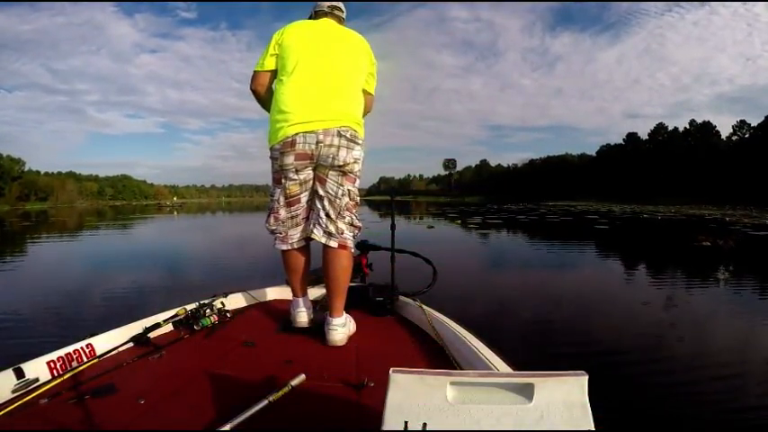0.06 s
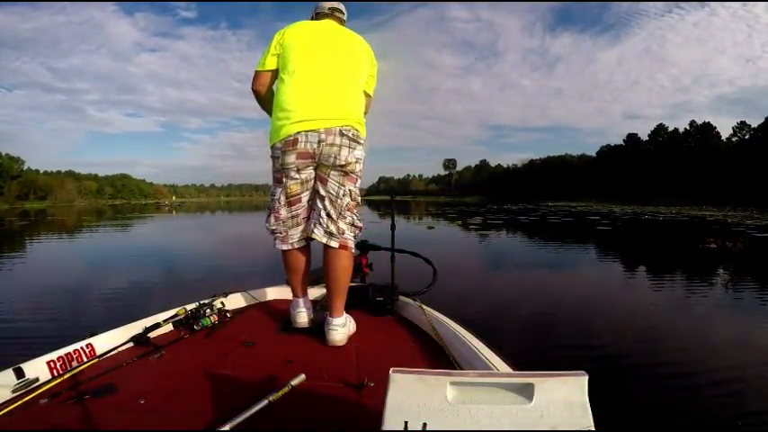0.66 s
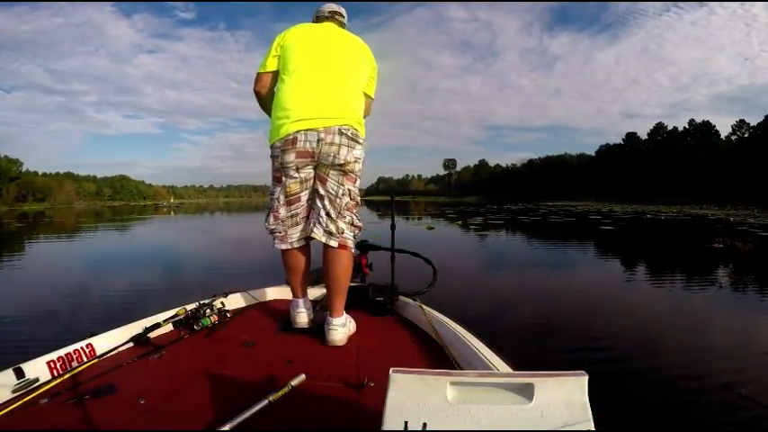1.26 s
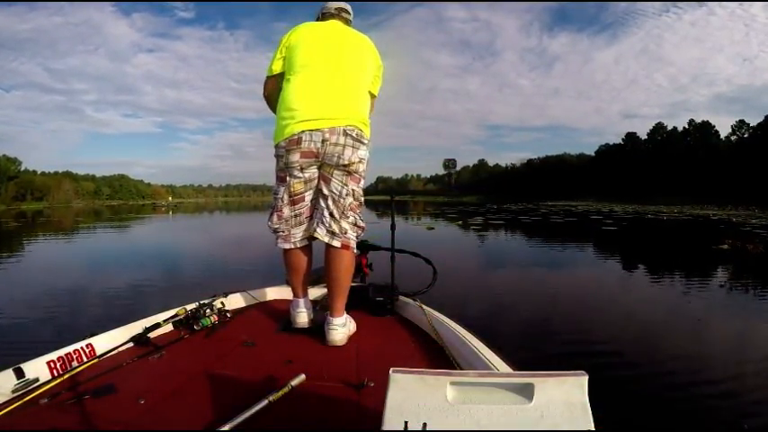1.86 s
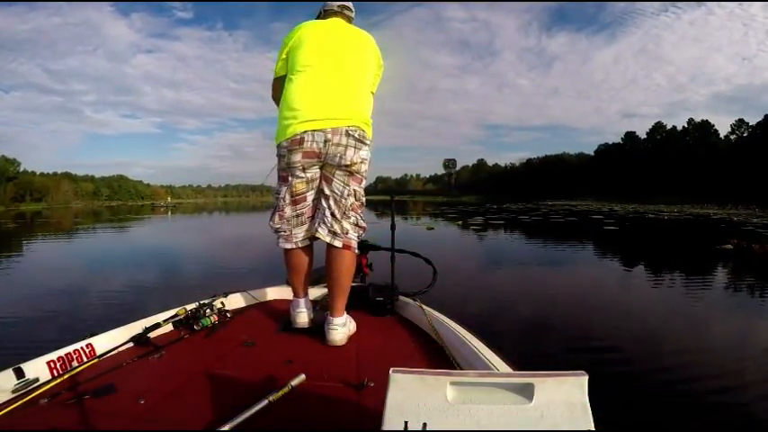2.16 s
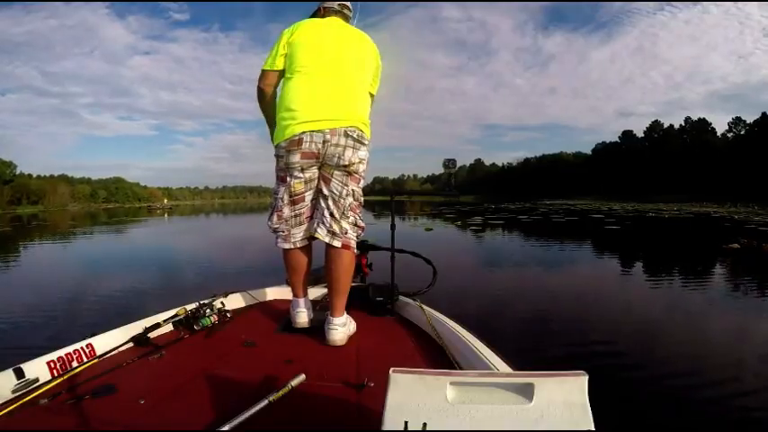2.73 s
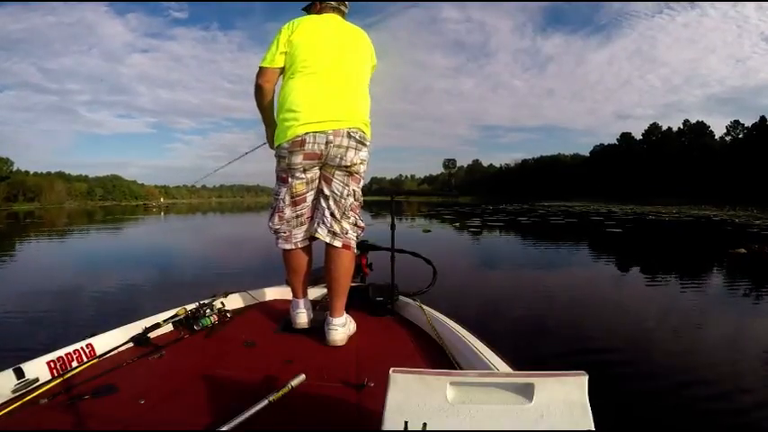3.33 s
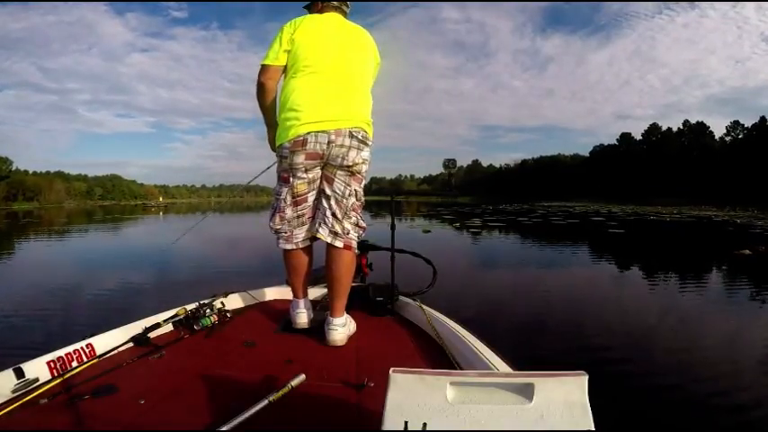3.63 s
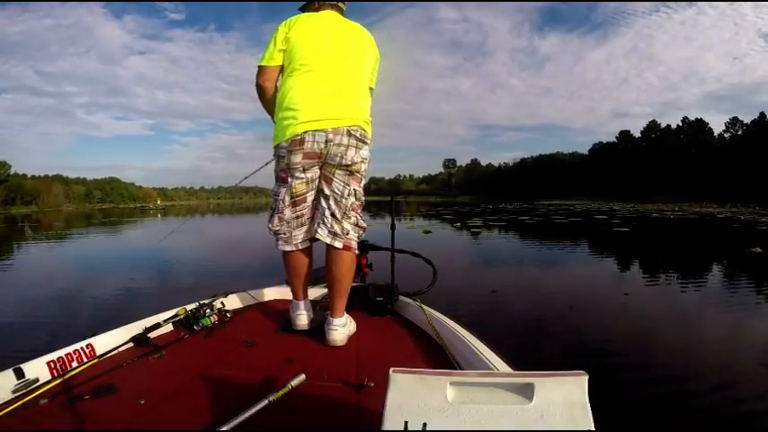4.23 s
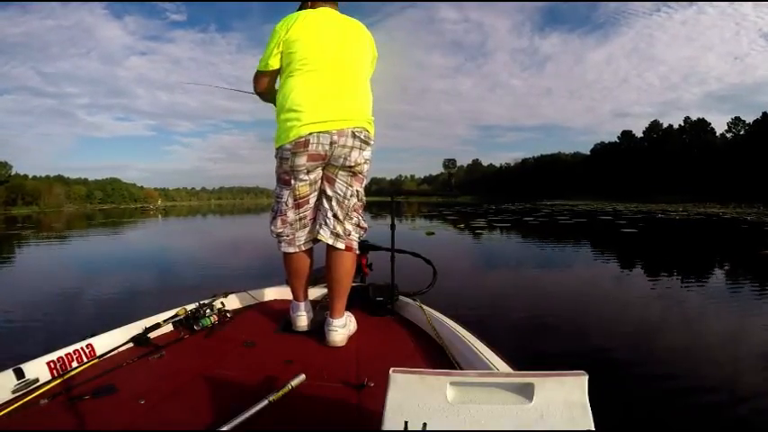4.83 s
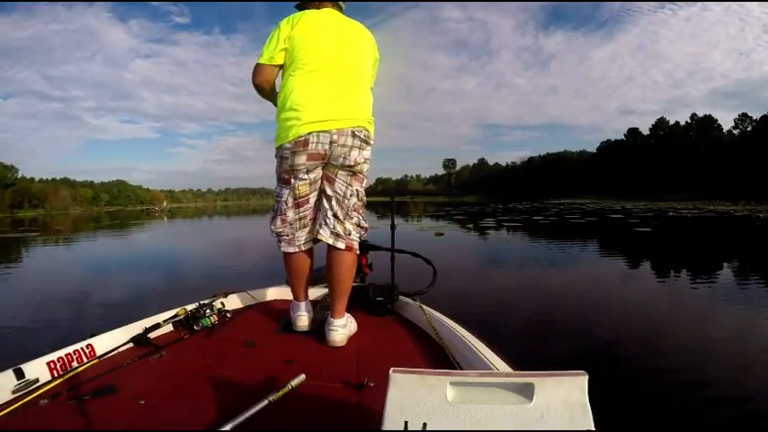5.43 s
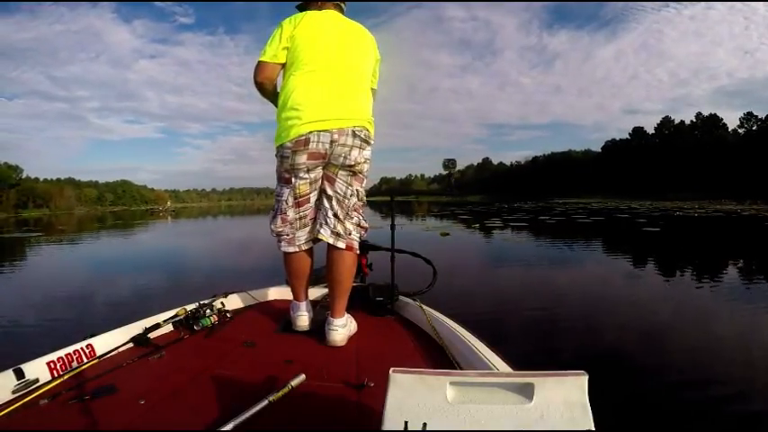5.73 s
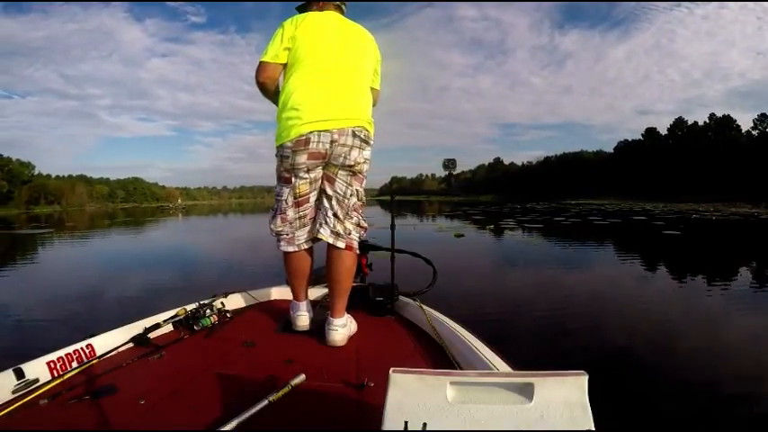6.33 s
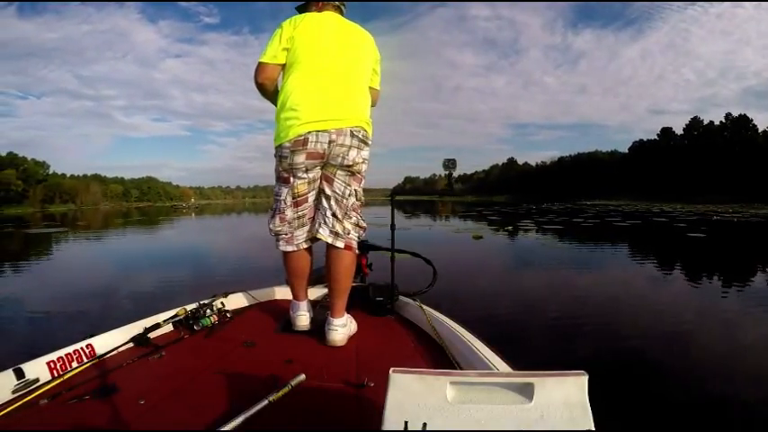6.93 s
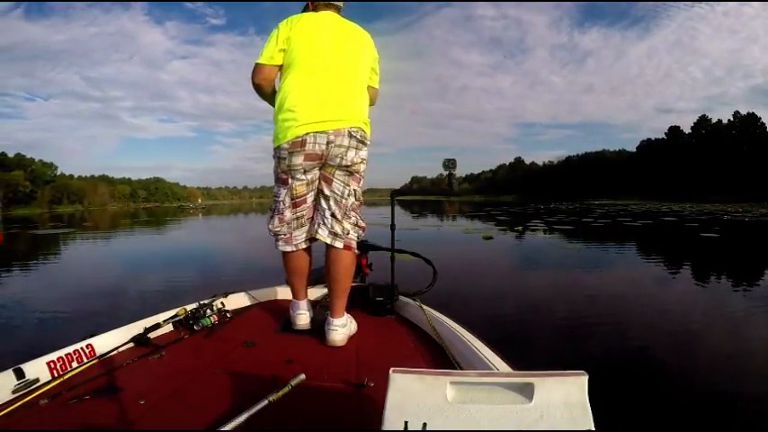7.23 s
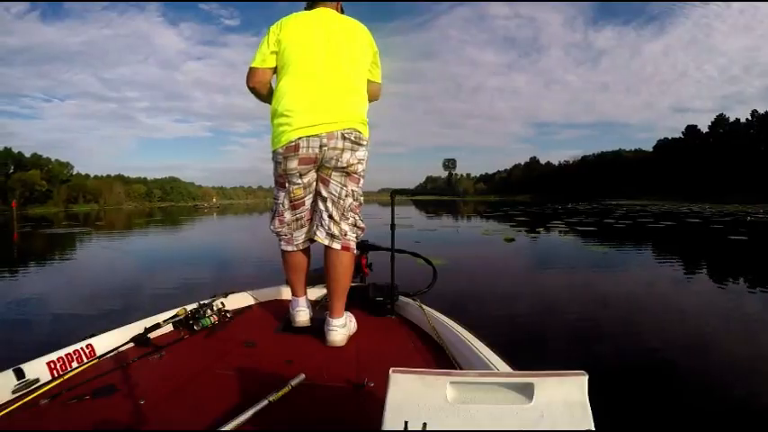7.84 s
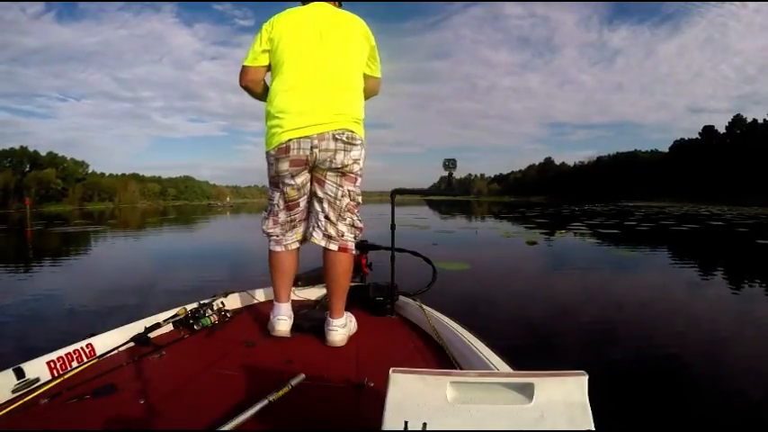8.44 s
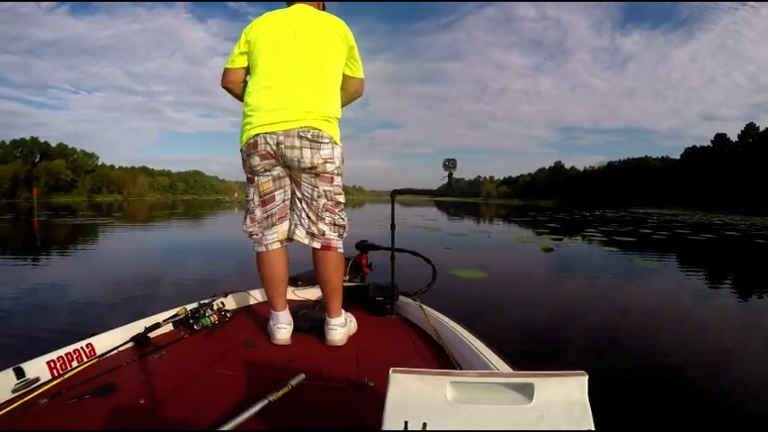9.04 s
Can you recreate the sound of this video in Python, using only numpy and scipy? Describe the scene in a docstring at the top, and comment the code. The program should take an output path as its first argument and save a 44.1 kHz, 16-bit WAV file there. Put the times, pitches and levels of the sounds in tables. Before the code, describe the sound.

Heard from close to the deck of a small boat on still water, a low electric motor hum pulses steadily over a rumbling hull and soft lapping. Light clicks come from the angler's tackle. About halfway through, a few dull footsteps boom on the deck as the wash swells and the hum shifts tone. A heavier cluster of steps lands near the end, while the motor cuts out and fades.

```python
"""A small fishing boat on a calm lake, microphone fixed on board, close to the deck.
From the start an electric trolling motor drones and throbs through the hull; ripples pat the bow and
the angler's tackle ticks. Between 4 and 5 s his feet thump on the hollow deck, the wash churns up and
the hum changes colour as the motor is steered. After 8 s come a second swirl and the loudest footfalls;
the power is cut at 8.4 s and the three-blade propeller coasts down."""
import sys
import numpy as np
from scipy import signal
from scipy.fft import rfft, irfft, next_fast_len
from scipy.io import wavfile

SR = 44100
rng = np.random.default_rng(int(sys.argv[2]) if len(sys.argv) > 2 else 0)


def int16_out(signal):
    """Quantize to a 16-bit WAV file."""
    q = np.round(np.clip(np.atleast_2d(signal).T, -1, 1) * 32767)
    wavfile.write(sys.argv[1], SR, q.astype(np.int16))


N = 405146
TIME = np.arange(N) / SR
STEER_S, STOP_S, SWING_S = 4.8, 8.4, 0.31  # motor steered, power cut, easing time of a swing


def gain_of(db):
    """Decibels to amplitude."""
    return 10 ** (np.asarray(db) / 20)


def unit_rms(x):
    """Scales to an rms of one."""
    return x / np.sqrt(np.mean(x ** 2) + 1e-20)


def spectrum_at(points, hz):
    """Interpolates (f/Hz, level/dB) points on a logarithmic frequency axis."""
    f, db = np.transpose(points)
    return np.interp(np.log(hz + 1), np.log(f + 1), db)


def curve(points):
    """One value per sample from (t/s, value) points."""
    return np.interp(TIME, *np.transpose(points))


def swell(peak_s, build_s, settle_s):
    """A smooth rise from nothing to one and back."""
    return np.exp(-((TIME - peak_s) / np.where(TIME < peak_s, build_s, settle_s)) ** 2)


def step(s, width_s):
    """A smooth change from nothing to one around time s."""
    return .5 + .5 * np.tanh((TIME - s) / width_s)


def add(mix, s, sound):
    """Mixes a sound in at time s."""
    part = mix[max(round(s * SR), 0):][:len(sound)]
    part += sound[:len(part)]


def shaped_noise(shape_db):
    """Noise of unit rms whose spectrum is a function of frequency."""
    size = next_fast_len(N)
    hz = np.fft.rfftfreq(size, 1 / SR)
    white = rfft(rng.standard_normal(size))
    return unit_rms(irfft(white * gain_of(shape_db(hz)), size)[:N])


def noise(colour):
    """Noise of unit rms coloured by (f/Hz, level/dB) points."""
    return shaped_noise(lambda hz: spectrum_at(colour, hz))


def band(centre_hz, half_width_hz):
    """Noise in one resonance; centred on zero it is a slow random drift."""
    return shaped_noise(lambda hz: -20 * np.log10(1 + ((hz - centre_hz) / half_width_hz) ** 2))


def puffs(events, colour, rise_s, t60):
    """A quickly dying burst of coloured noise for each (t/s, level/dB) event."""
    envelope, t = np.zeros(N), np.arange(SR // 4) / SR
    for s, db in events:
        add(envelope, s, (1 - np.exp(-t / rise_s)) * gain_of(db - 60 * t / t60))
    return envelope * noise(colour)


# Background hiss: f/Hz, relative level/dB
HISS_COLOUR = [(450, -12), (900, -3), (1200, -2), (2500, -3), (2950, -1.5), (3400, -2.5), (4600, -4),
               (5800, -7.5), (7400, -8.5), (8200, -13.5), (10400, -16.5), (13500, -20), (15000, -23)]
def steady_hiss(hiss_db=-67.02):
    """A steady hiss behind everything else."""
    return gain_of(hiss_db) * noise(HISS_COLOUR)


# The motor's speed controller, faint at the microphone: f/Hz, half-width/Hz, level/dB
CONTROLLER_HARMONICS = [(4786, 120, -81.5), (9560, 110, -90), (14380, 190, -96)]
def controller_whine():
    """The speed controller gives off a thin, fuzzy whine of three harmonics."""
    return sum(gain_of(db) * band(hz, width) for hz, width, db in CONTROLLER_HARMONICS)


# The angler moving, on board with the microphone: t/s, half-length/s, rise/dB
ANGLER_MOVES = [(1.15, 0.32, 1), (3.153, 0.38, 7), (4.1, 0.9, 5.5), (6.95, 0.44, -1), (8.548, 0.47, 0)]
def clothes_rustle(still_db=-80, clump_db=3):
    """Clothes and line rub faintly in short clumps, swelling with the larger movements."""
    level = still_db + sum(rise * swell(s, half, half) for s, half, rise in ANGLER_MOVES)
    colour = [(100, -59), (600, 4.5), (1080, 8.5), (1400, -1.5), (1900, 4.0), (3200, -4.0),
              (5000, -7.0), (9000, -43), (16000, -59)]
    return gain_of(level + clump_db * band(0, 23)) * noise(colour)


# Swirls beside the boat: peak t/s, build/s, settle/s, rise/dB
WASH_SWIRLS = [(4.68, 1.53, 0.5, 8.5), (8.44, 0.24, 0.29, 18)]
def churn_db():
    """The wash churns up around each swing of the motor; each sound follows its own share of the rise."""
    return sum(rise * swell(s, build, settle) for s, build, settle, rise in WASH_SWIRLS)


# Lapping at the waterline of the bow: f/Hz, relative level/dB
RIPPLE_COLOUR = [(150, -27), (350, 4.5), (550, -2), (680, -2.5), (800, -5.5), (1100, -11), (1700, -16.5),
                 (4000, -31), (9000, -41), (16000, -62)]
def bow_ripples(calm_db=-69, flicker_db=2, churn_share=0.35):
    """Ripples lap softly and without a break, rising with the churn."""
    level = calm_db + churn_share * churn_db() + flicker_db * band(0, 27)
    return gain_of(level) * noise(RIPPLE_COLOUR)


def hull_taps(calm_db=-64.5, per_s=5, spread_db=3, t60=0.02, churn_share=0.085):
    """Now and then a small ripple taps the hull, a little louder where the water churns."""
    out, t = np.zeros(N), np.arange(SR // 16) / SR
    level = calm_db + churn_share * churn_db()
    patter = noise([(200, -22.5), (600, -13), (1300, -13), (3000, -9), (8000, -20), (15000, -40)])
    for when, size in rng.random((round(per_s * TIME[-1]), 2)):
        at = int(when * (N - len(t)))
        db = level[at] + spread_db * (2 * size - 1)
        add(out, at / SR, gain_of(db - 60 * t / t60) * patter[at:at + len(t)])
    return out


# Larger ripples at the bow: t/s, relative level/dB
BOW_SLAPS = [(0.042, -54), (.163, -59), (.269, -60.5), (0.332, -56.5), (.541, -60), (.619, -62),
             (1.21, -58), (1.284, -60), (1.369, -61), (3.633, -58), (5.282, -59), (7.797, -72)]
# Their pat, heard from on board: f/Hz, relative level/dB
SLAP_COLOUR = [(200, -35), (480, 7), (680, 1), (1000, -7), (1800, -6), (3800, -16), (8000, -48),
               (15000, -55)]
def bow_slaps(gain_db=1.5):
    """A larger ripple meets the bow with a soft, dull pat."""
    return gain_of(gain_db) * puffs(BOW_SLAPS, SLAP_COLOUR, rise_s=0.002, t60=0.08)


# Churned water at the bow: f/Hz, relative level/dB
BOIL_COLOUR = [(60, -14), (105, -11), (155, 15), (205, -5.5), (250, 8), (285, 5), (322, 4), (365, -2.5),
               (405, -21), (470, -17), (520, -31), (600, -22), (670, -13.5), (760, -34), (1200, -53)]
def bow_boil(gain_db=-58.5):
    """Each swirl boils against the bow; the boil fades as the motor stops."""
    strength = (gain_of(churn_db()) - 1) * (1 - step(STOP_S, SWING_S))
    return gain_of(gain_db) * strength * noise(BOIL_COLOUR)


# The hull shaking under the microphone: f/Hz, relative level/dB
HULL_RUMBLE = [(17, -10), (30, -12), (40, -2.5), (50, 2.5), (60, 0), (70, -3), (82, -5), (95, -11.5),
               (115, -20.5), (170, -31.5), (230, -31), (400, -66), (1500, -100)]
# The hollow inside the hull: f/Hz, relative level/dB
HULL_DRUM = [(30, -47), (90, -33), (125, -6), (165, -10.5), (205, -13.5), (238, -10), (254, 1), (272, -11),
             (335, -16), (400, -22), (520, -29.5), (900, -65), (3000, -100)]
def hull_wash(rumble_db=-50.5, keel_db=-54, drum_db=-59, steered_db=-1, stopped_db=-5):
    """Propeller wash shakes the hull and drums in its hollow, easing when the motor stops."""
    churn = churn_db()
    rumble = gain_of(rumble_db + 0.25 * churn) * noise(HULL_RUMBLE)
    # as the boat turns, wash runs along the keel and stirs a higher hull resonance
    keel = gain_of(keel_db) * step(3.7, SWING_S) * band(centre_hz=87, half_width_hz=12)
    drum = gain_of(drum_db + churn + steered_db * step(STEER_S, SWING_S)) * noise(HULL_DRUM)
    return gain_of(stopped_db * step(STOP_S, 0.12)) * (rumble + keel + drum)


# Tackle and foot pedal, close by:
# t/s, relative level/dB, treble tilt/dB per octave, ring f/Hz, relative ring level/dB, t60/s
TACKLE_TICKS = [(1.661, -56, 1, 4430, 4.5, 0.023), (2.016, -59.5, -5, 3520, -4, 0.036),
                (2.13, -65, 5, 7100, 0, .04), (2.208, -66, 4, 6900, -1, 0.027),
                (2.315, -68, 4, 6600, 3, 0.059), (2.341, -67, 5, 7000, 0, 0.05),
                (2.558, -54.5, -2.5, 3100, -13, 0.049), (3.133, -57.5, -3, 1050, -13, 0.044),
                (4.021, -53.5, -7.5, 650, -2, 0.03), (4.144, -53, 4, 11000, -13, 0.038),
                (4.788, -56, -5, 2860, 0.5, 0.052), (5.182, -62, -2, 3000, 5, .035),
                (5.195, -57, -4, 2830, 1, 0.039), (5.202, -52, 2, 2920, 9, 0.035),
                (5.209, -54, -7, 3500, -10, 0.048), (7.8, -64, -3, 2200, 2, .05),
                (8.247, -56, -3, 676, 3, 0.051), (8.272, -48, -5.5, 1610, -7, 0.064),
                (8.291, -56, -8, 1600, 0, .05), (8.314, -43.5, -15, 1160, -11, 0.034),
                (8.364, -56.5, -14, 2930, 0, 0.043), (8.371, -53, -10, 2900, -1.5, 0.032),
                (8.454, -49.5, -11.5, 2170, -11.5, 0.091), (8.479, -60, -8, 1390, 2, 0.082)]
# Resonances of the tackle: f/Hz, width/Hz, relative level/dB
TACKLE_MODES = [(724, 770, -24), (1640, 1200, 6), (2260, 45, 6), (3370, 900, 6), (3960, 1000, 2),
                (5800, 2900, 8.5), (7400, 1800, -10), (11000, 1500, -22)]
def tackle_ticks(gain_db=1, ring_gain_db=1, rise_share=0.026, ring_width_share=0.097):
    """A brief scrape excites the tackle; the part that was hit adds a damped resonance of its own."""
    out, t = np.zeros(N), np.arange(SR // 8) / SR
    hz = np.fft.rfftfreq(len(t), 1 / SR)

    def resonance(centre, width):
        return 1 / (1 + (2 * (hz - centre) / width) ** 2)

    body = sum(gain_of(db) * resonance(f, width) / np.sqrt(width) for f, width, db in TACKLE_MODES)
    for s, db, tilt, ring_hz, ring_db, t60 in TACKLE_TICKS:
        attack = 1 - np.exp(-t / (rise_share * t60))  # short ticks start sharpest
        envelope = attack * gain_of(db + gain_db - 60 * t / t60)
        rub, knock = rfft(rng.standard_normal((2, len(t))))
        scrape = unit_rms(irfft(rub * body * gain_of(tilt * np.log2(hz + 500)), len(t)))
        ring = unit_rms(irfft(knock * resonance(ring_hz, ring_width_share * ring_hz), len(t)))
        add(out, s, envelope * (scrape + gain_of(ring_db + ring_gain_db) * ring))
    return out


# The hollow deck under the microphone: f/Hz, relative level/dB, t60/s
DECK_MODES = [(53.2, 13, 0.23), (60.6, 0.5, 0.21), (82.6, 4, 0.5), (126.5, -9, 0.43), (159, -8.5, 0.32),
              (183.4, -1.5, 0.17), (225.6, -2, 0.081), (253.2, 0.5, 0.22), (276, -2.5, 0.12),
              (327, -3.5, 0.14), (358.3, 1.5, 0.16), (385, -3, 0.1), (420, 1, 0.2), (463, -2.5, 0.13),
              (581, -5, 0.15), (630, -13, 0.09), (666, -9.5, 0.14)]
# Feet landing nearby, levels relative: t/s, boom/dB, knock/dB, clap/dB, f/Hz of the spot
FOOTFALLS = [(4.024, -65, -62, -57, 615), (4.633, -37.5, -45, -58, 360), (4.790, -49, -42, -48.5, 365),
             (4.801, -42, -35, -58, 180), (4.825, -35.5, -52, -75, 260), (4.903, -38, -43.5, -65, 177),
             (8.113, -41.5, -42, -85, 171), (8.279, -39, -33.5, -69, 252), (8.314, -35.5, -44, -62, 255),
             (8.366, -38, -41.5, -44, 260), (8.417, -50, -44, -48, 416), (8.447, -30.5, -26, -55, 220),
             (8.476, -27.5, -32.5, -58, 258), (8.497, -41, -35.5, -59, 255), (8.604, -43, -50, -62, 251),
             (8.677, -44, -44, -69, 254), (8.792, -44, -46.5, -62, 290), (8.962, -48, -47, -59, 211),
             (9.03, -47.5, -55.5, -76, 255), (9.097, -51, -52, -70, 255)]
def deck_thumps(spot_db=5, spot_octaves=0.18, boom_lag_s=0.015, rise_cycles=0.89, detune=0.0012):
    """Each footfall rings the deck modes, favouring those of the spot it lands on."""
    out = np.zeros(N)
    hz, mode_db, t60 = np.transpose(DECK_MODES)[:, :, None]
    low = hz < 100  # the weight lands after the heel and rocks these modes
    t = np.maximum(np.arange(SR) / SR - boom_lag_s * low, 0)
    attack = (1 - np.exp(-t * hz / rise_cycles)) ** 2
    for s, boom, knock, clap, spot_hz in FOOTFALLS:
        blow_db = spectrum_at([(85, boom + 2), (150, knock + 3), (295, knock + 3), (380, clap + 3)], hz)
        blow_db += spot_db * np.exp(-(np.log2(hz / spot_hz) / spot_octaves) ** 2)
        pitch = hz * (1 + detune * rng.standard_normal(hz.shape))
        phase = ~low * rng.random(hz.shape)  # the weight always pushes the low modes the same way
        envelope = attack * gain_of(mode_db + blow_db - 60 * t / t60)
        add(out, s, (envelope * np.sin(2 * np.pi * (pitch * t + phase))).sum(0))
    return out


def sole_scuffs(scuff_db=-9):
    """Each sole rubs the carpet as it lands: a short, dull puff."""
    landings = [(s, clap + scuff_db) for s, _, _, clap, _ in FOOTFALLS]
    colour = [(200, -8), (420, 4), (650, -4), (850, -7), (1400, -15), (4000, -40)]
    return puffs(landings, colour, rise_s=0.0023, t60=0.078)


# Weaker hum lines in the hull: multiple of the throb rate, relative level/dB before steering, and after
HUM_LINES = [(2, -61.8, -57.6), (3, -61.5, -55.6), (4, -56.6, -60.8), (5, -48.8, -53.2), (7, -64.5, -66.3),
             (8, -67.2, -62.9), (9, -66.0, -76.5), (10, -65.6, -71.1), (11, -73.8, -76.0),
             (13, -77.9, -71.3), (14, -78.6, -72.0), (15, -74.8, -66.4), (17, -61.2, -65.5),
             (18, -66.5, -76.3), (19, -79.2, -72.2), (20, -70.0, -71.0), (21, -62.5, -71.3),
             (22, -59.9, -64.7), (23, -75.7, -83.4), (25, -75.7, -82.3), (26, -69.9, -66.5),
             (27, -74.5, -82.2), (28, -88.7, -76.4), (30, -72.7, -76.3), (32, -83.9, -80.5),
             (36, -80.3, -85.2), (48, -89.4, -86.0)]
# The throb, one row before steering and one after: first beat t/s, relative smear
THROB_TIMING = [(.024, 0.063), (.041, 0.088)]
def shaft_throb(throbs, start_hz, gain_db=2.5, waver_db=1.3, churn_share=0.089):
    """Hum lines beat together as a throb; steering shifts the shaft on its mount and so their mix."""
    out = np.zeros(N)
    steered = step(STEER_S, 0.22)
    crossfade = np.sqrt([1 - steered, steered])
    buzz_db = churn_share * churn_db() * (1 - steered)  # the first swirl lifts the high lines
    knots = np.linspace(0, TIME[-1], 40)
    for multiple, *levels in HUM_LINES:
        waver = np.interp(TIME, knots, rng.standard_normal(len(knots)))
        strength = gain_of(gain_db + waver_db * waver + buzz_db * (multiple > 12))
        for share, db, (first_s, smear) in zip(crossfade, levels, THROB_TIMING):
            # the low lines arrive together; the hull smears the higher ones in time
            lag = first_s * start_hz + smear * (rng.random() - .5) / 2
            out += share * strength * gain_of(db) * np.cos(2 * np.pi * multiple * (throbs - lag))
    return out


# The blade tone as the load on the propeller swells and eases: t/s, relative level/dB
BLADE_LOAD = [(0.0, -27.5), (.2, -35), (0.73, -42), (.98, -36.5), (1.39, -35.5), (2.41, -41), (2.6, -35.5),
              (3.6, -43.5), (4.05, -41.5), (4.3, -65), (4.75, -52), (4.97, -34.5), (5.25, -32.5),
              (5.95, -39), (6.29, -36.5), (6.55, -46.5), (6.8, -45), (7.05, -43), (7.6, -46.5),
              (8.23, -40.5), (8.75, -35.5), (8.86, -36), (8.95, -47), (9.19, -68)]
# What each heading passes to the hull in calm water: from t/s, 2nd harmonic/dB, 4th harmonic/dB
HEADING_HARMONICS = [(0, -50, -50.5), (4.95, -44.5, -58.5), (7.8, -54.5, -44)]
def blade_drone(passes, blade_db=-1, flutter_db=0.85, churn_dulls=0.51):
    """Passing blades make a tone and its 2nd and 4th harmonics, which churned water weakens."""
    headings = np.array(HEADING_HARMONICS)
    changes = np.diff(headings[:, 1:], axis=0)
    glide_db = sum(change[:, None] * step(s, SWING_S) for s, change in zip(headings[1:, 0], changes))
    harmonics_db = headings[0, 1:, None] + glide_db - churn_dulls * churn_db()
    tones = []
    for octave, db in enumerate([curve(BLADE_LOAD) + blade_db, *harmonics_db]):
        strength = gain_of(db + flutter_db * band(0, 2.3))
        tones.append(strength * np.cos(2 * np.pi * (2 ** octave * passes + octave * rng.random())))
    return tones


# The propeller below the boat: t/s, blade-pass f/Hz
BLADE_RATE = [(0, 71.3), (2.2, 71.55), (3.8, 71.88), (6.2, 72.04), (7.2, 72.64), (8.2, 72.4), (8.72, 72),
              (8.83, 62), (8.92, 58), (9.19, 45)]
def trolling_motor(passes_per_throb=6, jitter=0.00085, run_down_s=0.28):
    """Three blades drone and throb every second turn; unpowered, the hum dies and the blade tone sags."""
    throb_hz = curve(BLADE_RATE) / passes_per_throb
    throbs = np.cumsum(throb_hz * (1 + jitter * band(0, 12.4))) / SR
    first_beat_s = THROB_TIMING[0][0]
    passes = passes_per_throb * (throbs - first_beat_s * throb_hz[0])
    blade, second, fourth = blade_drone(passes)
    hum = second + fourth + shaft_throb(throbs, throb_hz[0])
    return blade + hum * np.exp(-np.maximum(TIME - STOP_S, 0) / run_down_s)


def scene():
    """Motor, water and angler at one microphone fixed to the boat."""
    motor = trolling_motor()
    water = hull_wash() + bow_ripples() + bow_boil() + hull_taps() + bow_slaps()
    background = controller_whine() + steady_hiss()
    angler = deck_thumps() + sole_scuffs() + tackle_ticks() + clothes_rustle()
    return (background + water + angler + motor)[None]


def record(dry):
    """The recorder's band limit: a steep low-pass at 15250 Hz."""
    low_pass = signal.firwin(511, 15250, window=("kaiser", 9), fs=SR)
    return signal.oaconvolve(dry, low_pass[None], "same")


dry = scene()
out = record(dry)
int16_out(out)
```